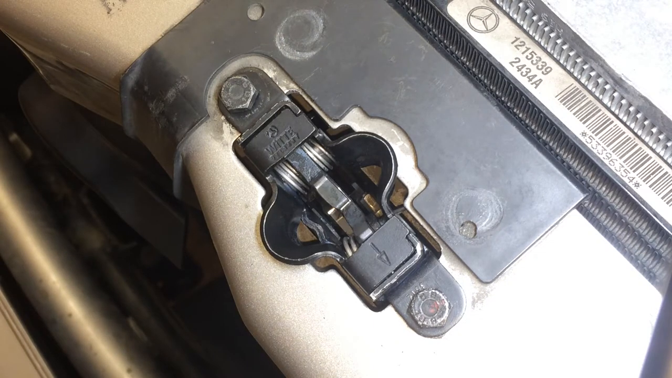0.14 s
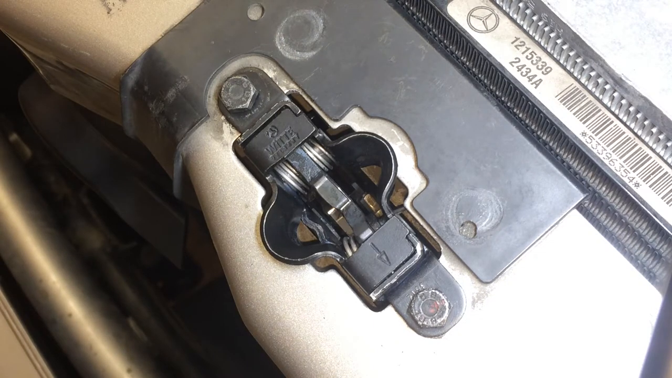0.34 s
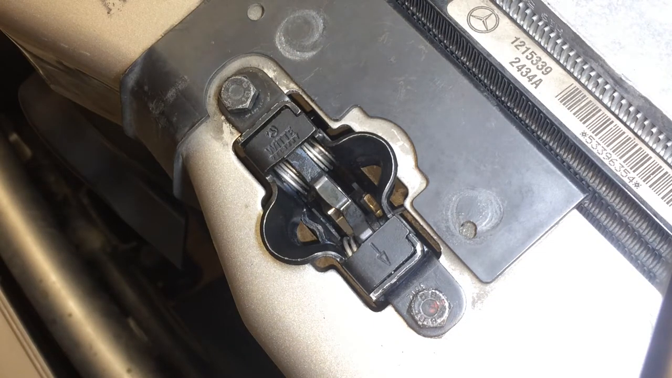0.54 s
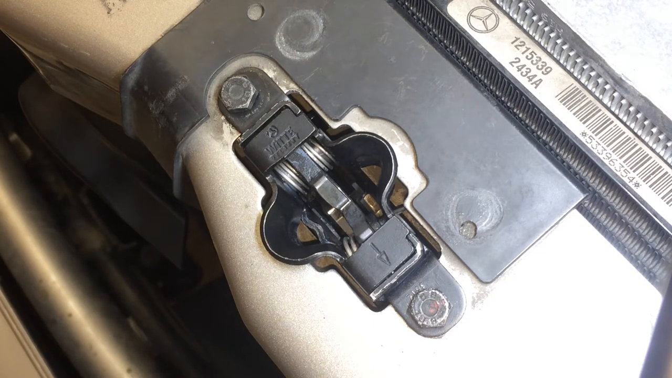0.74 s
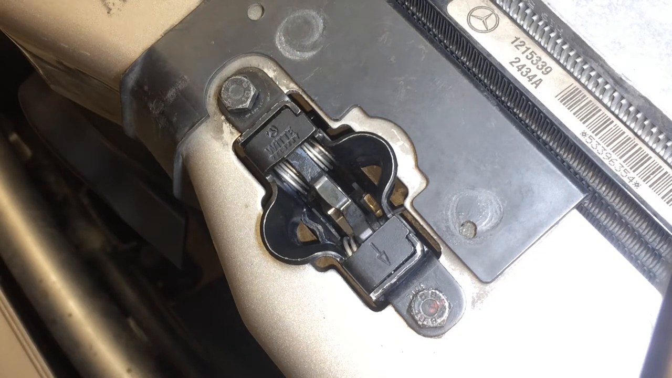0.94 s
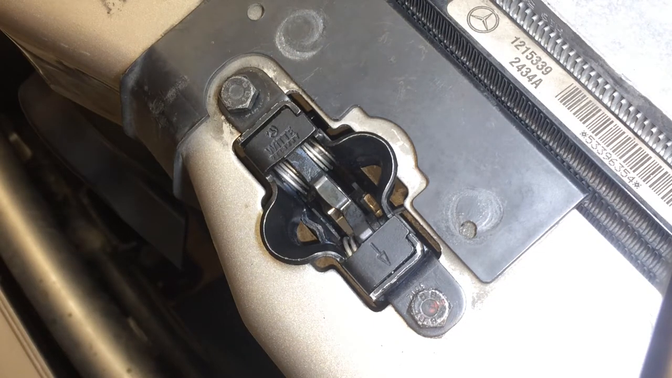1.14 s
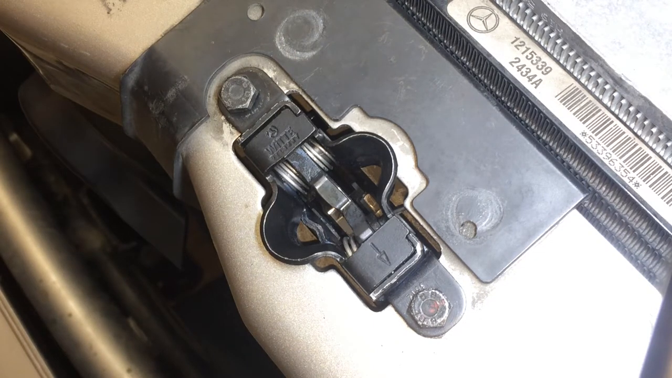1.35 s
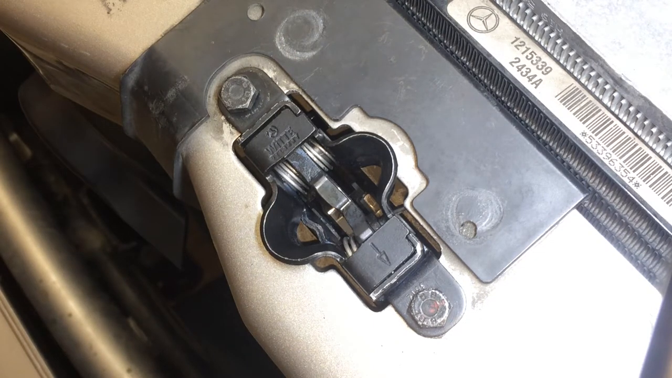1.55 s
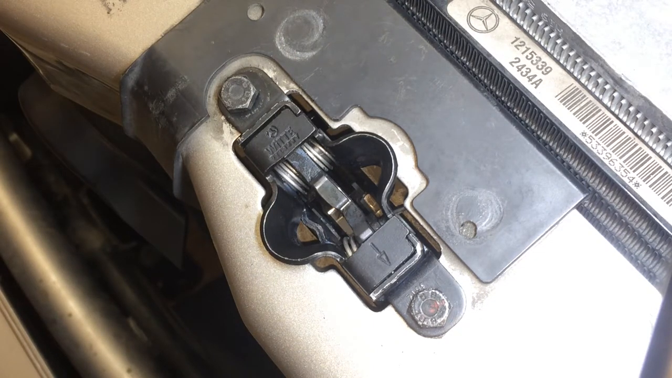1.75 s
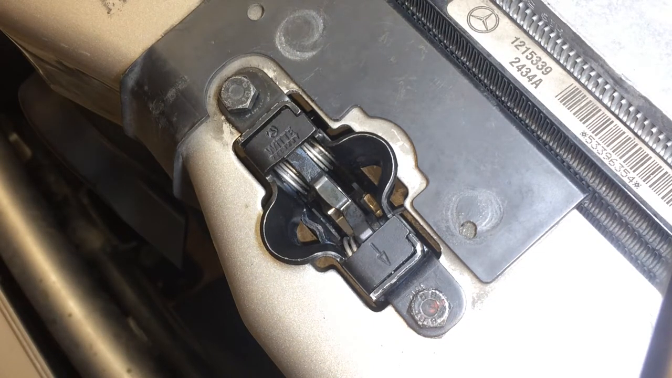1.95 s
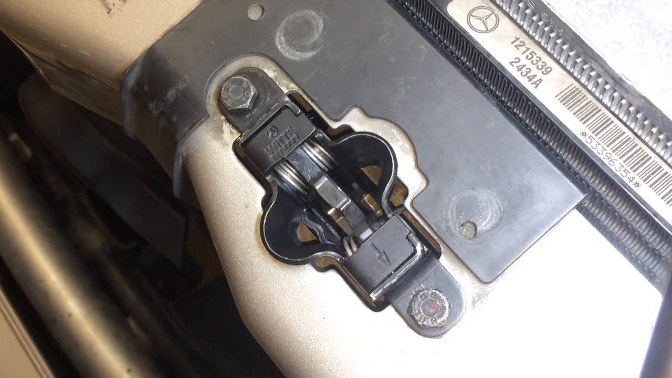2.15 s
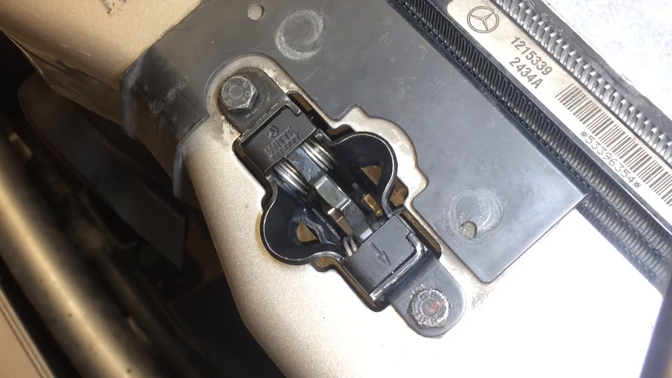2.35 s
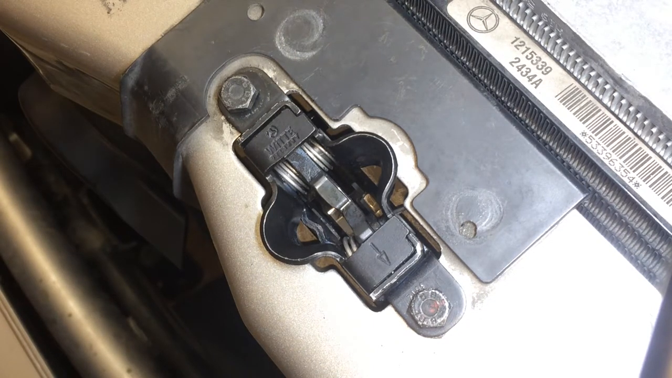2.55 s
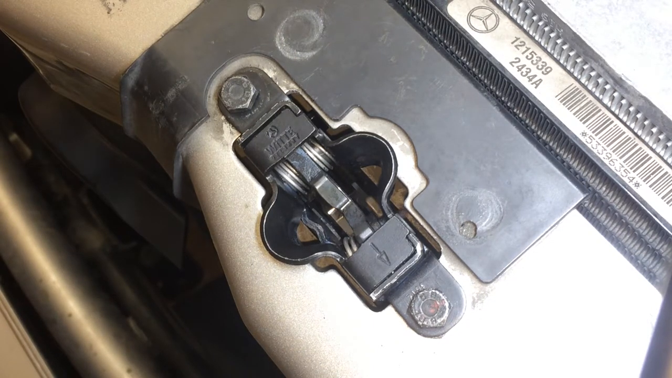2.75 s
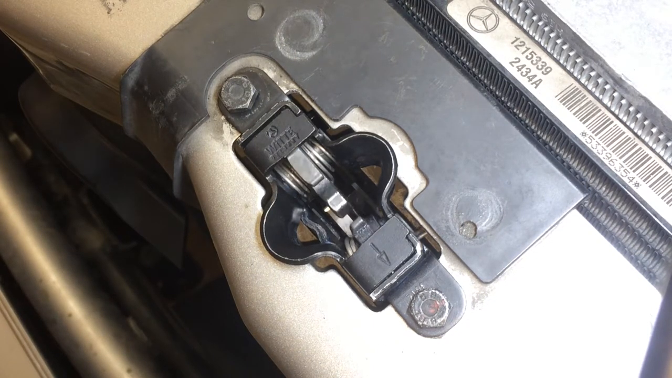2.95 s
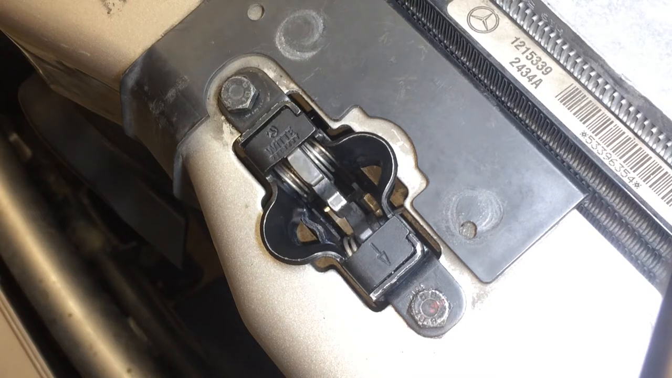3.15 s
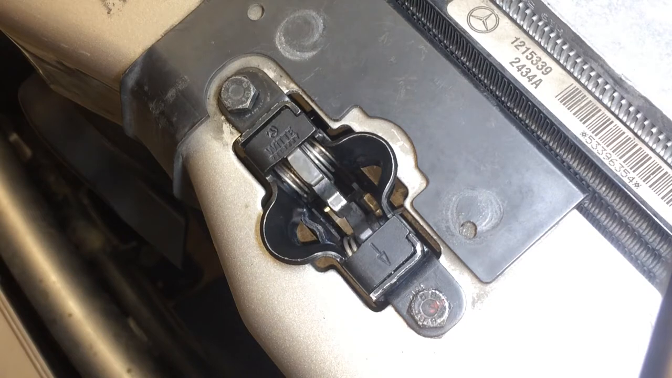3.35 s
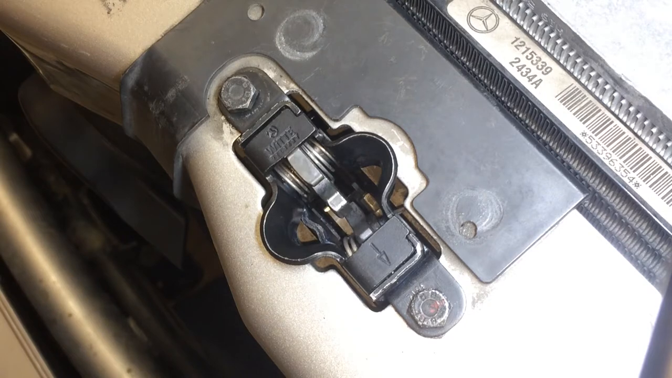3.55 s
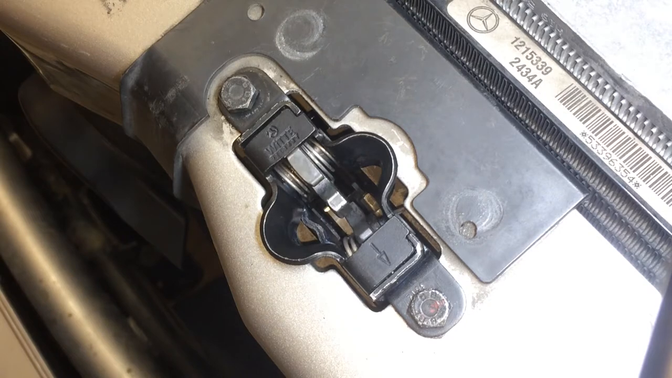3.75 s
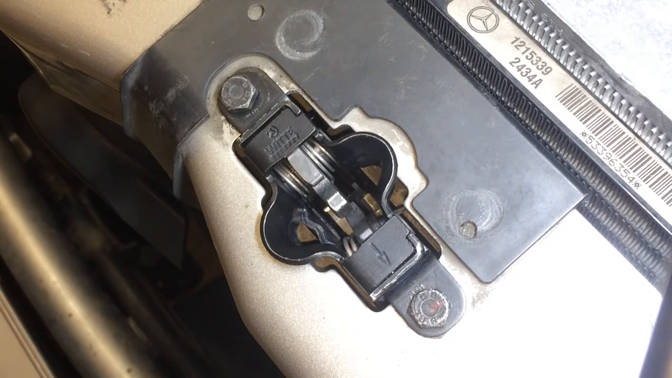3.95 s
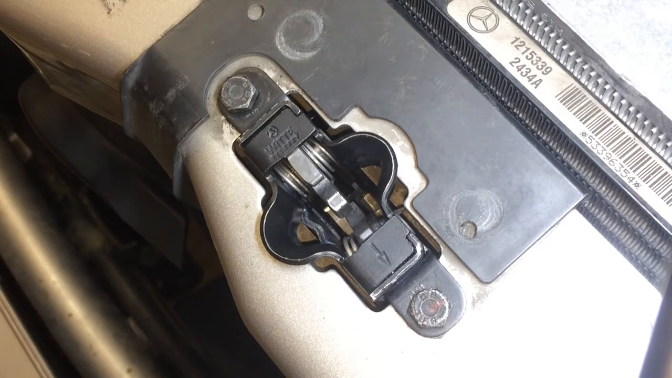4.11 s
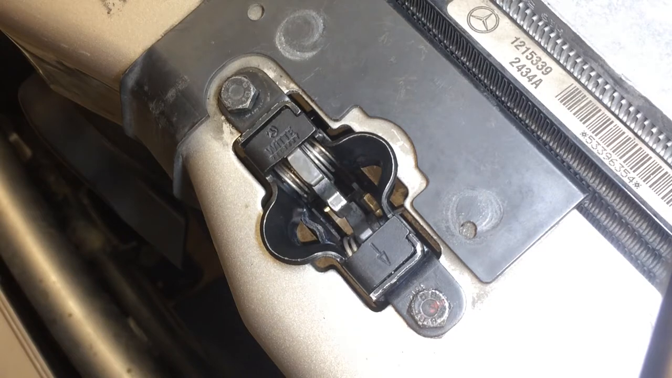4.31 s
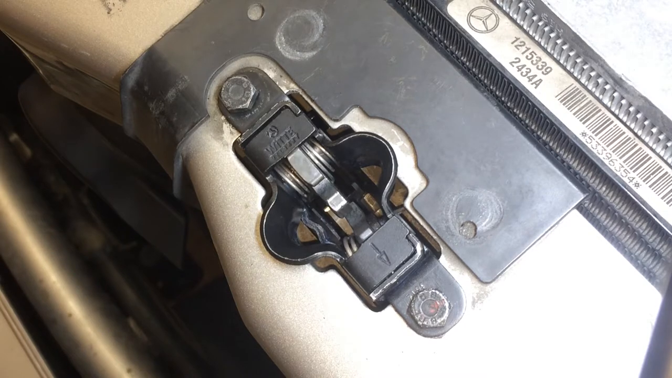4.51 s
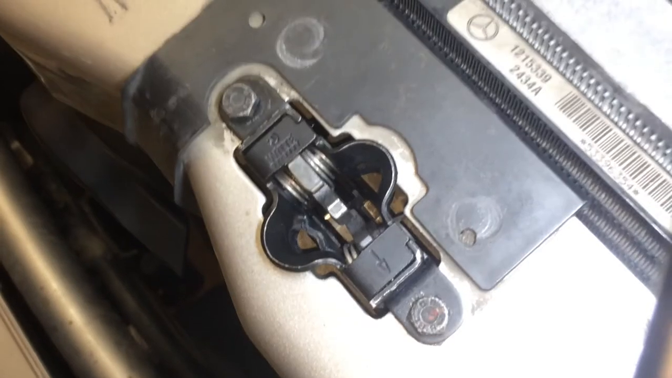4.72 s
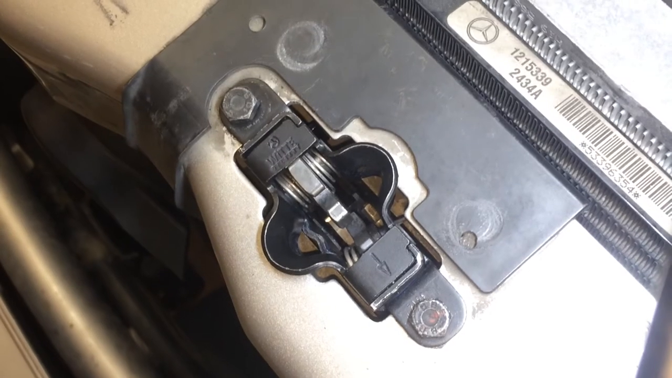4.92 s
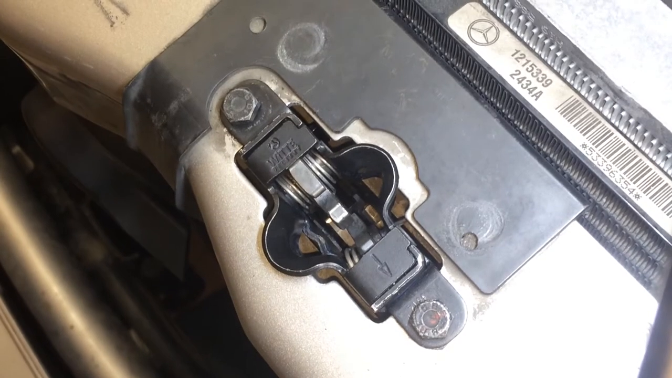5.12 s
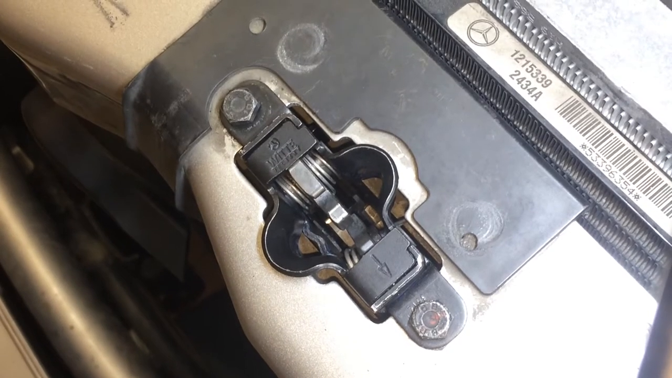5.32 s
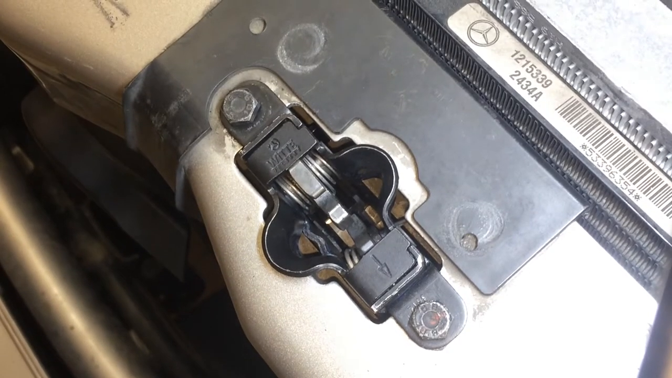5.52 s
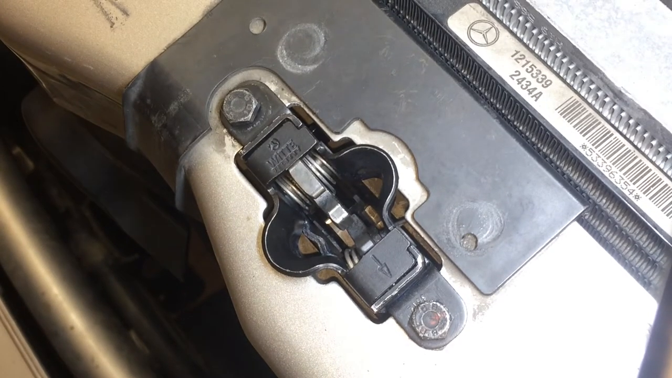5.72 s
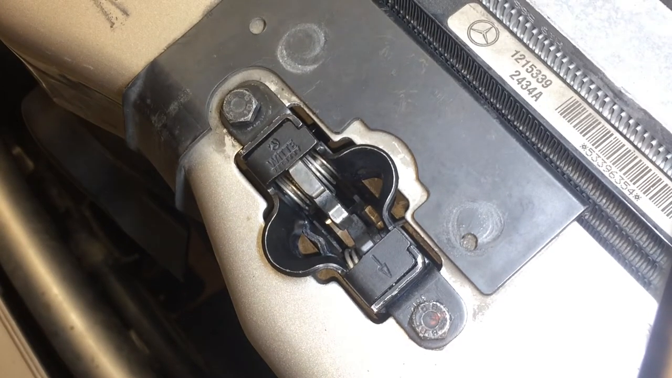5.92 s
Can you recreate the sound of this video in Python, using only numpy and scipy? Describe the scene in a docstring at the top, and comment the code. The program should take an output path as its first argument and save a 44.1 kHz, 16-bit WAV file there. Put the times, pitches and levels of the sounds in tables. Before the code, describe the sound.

A quiet garage with a very faint motor hum throughout. Soft footsteps and scuffs come in the first second. At about 0.9 seconds a car door unlatches with a clunk and a small clink, its hinge creaks briefly, and at 1.3 seconds it hits its stop with a hollow thump. Faint steps follow around 1.8 seconds, and a light knock at 2.4. At 2.9 seconds the steel hood latch snaps open close to the microphone: a sharp crack with a short metallic ring, the loudest sound. Its lever springs back with a smaller click at 3.1 seconds. After a couple of soft steps, the door slams at about 4.6 seconds, farther away than the latch, with a boomy thud and a brief shudder of sheet metal. A light hollow knock and a few quiet steps come between 5.5 and 5.8 seconds.

```python
"""A car's steel hood latch snaps open close by in a garage, and its lever springs back with a click.
Before that, someone steps up and opens the car door to pull the hood release; afterwards the door
is slammed and the steps move on. Each blow is a burst of noise, often with fading tones for the
ringing metal. A motor hums faintly. An automatic volume control turns everything down after the snap."""
import sys
import numpy as np
from scipy.fft import rfft, irfft, next_fast_len
from scipy.io import wavfile
from scipy.ndimage import uniform_filter1d, map_coordinates

SR = 44100
rng = np.random.default_rng(int(sys.argv[2]) if len(sys.argv) > 2 else 0)


def wav_out(sig):
    """Save sig, one row per channel (or a flat mono array), as 16-bit PCM at SR to the path in sys.argv[1]."""
    wavfile.write(sys.argv[1], SR, np.round(np.clip(np.atleast_2d(sig).T, -1, 1) * 32767).astype(np.int16))


N = 267775
TIME = np.arange(N) / SR
AGE = np.arange(SR) / SR  # seconds since a blow; each blow gets one second

# A spectrum says how strong a noise is at each pitch, low to high.
# "rise" is the time a sound takes to swell, "t60" the time it takes to fade by 60 dB.
MOTOR_TONES = [(59.2, -70.5), (118.4, -71), (414.5, -79), (721.4, -84), (877.5, -75), (1303, -90),
               (1707, -86.5), (2078, -92)]  # the motor's hum and whine: f/Hz, level/dB
# spectra of the low rumble and soft hiss of the garage: f/Hz, level/dB
RUMBLE = [(12, -66), (20, -39), (43, -6.5), (70, -3.5), (87, -18.5), (118, 1), (147, -14.5), (212, -7.5),
          (235, -15), (414, -15.5), (600, -27), (780, -58.5), (1320, -120)]
AIR = [(350, -44.5), (600, -14.5), (850, -13), (1050, -16.5), (1400, -17.5), (1750, -13.5), (2100, -20.5),
       (2600, -24.5), (4600, -27.5), (9000, -30.5), (15500, -34)]
# how long echoes last in the garage and right around the latch: f/Hz, t60/s
GARAGE_ECHO = [(50, 0.71), (130, 0.84), (450, 0.46), (1400, 0.56), (4000, 0.53), (7000, 0.42), (12000, 0.4)]
NEAR_ECHO = [(150, 0.27), (600, 0.26), (1500, 0.34), (3600, .38), (7000, 0.2782), (12000, 0.24)]

STEPS = [(0.208, -43.5, -60), (1.754, -52, -64.5), (1.921, -56, -52), (3.717, -50.5, -70),
         (4.402, -55, -87), (5.653, -56, -59), (5.797, -55.5, -63)]  # footsteps: t/s, weight/dB, grit/dB
SCUFFS = [(0.301, -63), (.39, -64.5), (.595, -64), (.81, -66.5), (1.706, -65.5), (2.075, -59),
          (5.509, -65.5)]  # brushing shoes and clothes: t/s, level/dB
# spectra of a deep thud, a gritty scrape and a bright tick: f/Hz, level/dB
THUD = [(25, -24.5), (70, -9), (130, 3), (190, -3.5), (330, -11.5), (600, -31), (1500, -64), (4000, -91)]
GRIT = [(300, -9), (1200, 3), (2600, 3), (5000, -3), (8000, -7.5), (15000, -20.5)]
TICK = [(1500, -30), (4000, -6), (7000, 2), (11000, -1), (15000, -4)]
KNOCK_SHAPE = [(.15, -26.5), (.45, 0.5), (.7, 3), (1.3, -1.5), (1.8, -6), (3, -14.5), (8, -44)]  # spectrum of a knock: multiple of its centre pitch, level/dB

BUMPS = [(.840, -48.5, -55), (.89, -44.5, -51.5), (1.25, -53, -53.5), (1.312, -31, -32.5),
         (1.434, -45.5, -49), (4.606, -37, -34)]  # the door nudges its catch and stop: t/s, thud/dB, knock/dB
REBOUNDS = [(1.391, -34, -67), (4.697, -29, -38)]  # its first bounce off the stop or seal: t/s, thud/dB, knock/dB
LOCK_TICKS = [(0.841, -59, 0.015), (1.438, -63.5, 0.22), (4.7198, -40, 0.019)]  # the lock is pulled, comes to rest and seats: t/s, level/dB, t60/s
CREAKS = [(1.02, 0.0036, -45), (1.034, 0.0013, -37), (1.054, 0.0035, -45), (1.079, .006, -50),
          (1.115, 0.0089, -54), (1.17, .01, -59)]  # hinge creaks: t/s, rise/s, level/dB
# ringing tones of the door's handle, lock and hinge, and of loose sheet metal: f/Hz, level/dB, t60/s
HANDLE_TONES = [(2340, -14, 0.38), (2580, -16, .35), (3700, -5, 0.16), (4220, 0, 0.13), (4750, -2, 0.15),
                (5200, -1, 0.11), (6370, -12, 0.22)]
LOCK_TONES = [(1010, -7, 0.61), (1108, -8, 1), (1240, -9, 0.24), (1580, -16, 0.46), (2220, -23, 0.46),
              (2480, -21, 0.16), (2840, -29, 0.41), (4080, 9, 0.21), (5270, -14, 0.17), (5330, 3, 0.21),
              (6000, -6, 0.31), (6368, 0.5, 0.36), (6600, -3, 0.24), (7400, -36, 0.31)]
HINGE_TONES = [(1160, -0.5, 0.099), (1270, 2, 0.19), (1310, -1, 0.17), (1426, -5, 0.27), (1560, -9, 0.24),
               (1615, -5, 0.13)]
SHEET_TONES = [(118.8, 4.5, 1.6), (186, 3.5, 1), (770, -11, 1.05), (990, -2.5, 0.77), (1000, -8, 0.71),
               (1100, -15, 0.89)]
# the door unlocks, hits its stop, slams: t/s, rise/s, clatter/dB, panel/dB, lock/dB, clatter t60 factor
DOOR_BLOWS = [(0.947, 0.016, -28.5, -25, -54, 0.75), (1.310, 0.011, -26, -24, -51.5, 0.78),
              (4.620, 0.012, -17, -16.5, -38, 0.72)]
# car body tones; each blow lands elsewhere and has its own mix: f/Hz, t60/s, unlock/dB, swing/dB, slam/dB
PANEL_TONES = [(40.4, 0.41, -24, -27, -11), (54.1, 1, -19, -15, -9), (74.8, 0.38, -4, -14, -8),
               (114.56, 0.73, -19, 0, -10.5), (132.1, 0.4, 4, -17, 1), (188.3, 0.56, -11, -21, -17),
               (205.7, 0.42, -16, 2.5, -10.5), (263.6, 0.26, -26, -3, -11), (301.5, 0.39, -4.5, -5, -10),
               (330.6, 0.27, -7, 2, -9.5), (385.6, 0.47, -14, -10, -18), (396, 0.27, -7, -6.5, -8.5),
               (439, 0.29, -20, -10, -10), (490, 0.3, -10.5, -6, -16), (542, 0.45, -15.5, -10, -16.5),
               (652, 0.35, -20, -26, -16), (740, 0.46, -39, -10, -22), (807, 0.19, -35, -3.5, -37),
               (926, 0.27, -32, -22, -14.5), (989, 0.38, -31, -10.5, -22), (1162, 0.2, -32, -10.5, -12),
               (1272, 0.22, -32, -13, -19)]
# spectra of the three blows' clatter and of the body's shudder afterwards: f/Hz, level/dB
UNLOCK = [(18, -50), (30, -8.5), (144, -8.5), (249, -7.5), (399, -13), (591, -19), (852, -18.5), (996, -25),
          (2130, -28), (2760, -35.5), (3980, -35), (5040, -32), (6050, -39.5), (13600, -51.5),
          (15500, -63.5)]
SWING = [(18, -58), (30, -25), (102, 4), (208, -2), (263, -15.5), (341, -13), (410, -17), (728, -18),
         (874, -26), (970, -16), (1110, -22), (1290, -25), (1870, -23.5), (3980, -31), (15500, -64)]
SLAM = [(15, -40), (25, -2), (69, -8), (119, -3), (183, -13.5), (289, -9), (368, -21), (537, -13.5),
        (582, -16.5), (919, -17), (1050, -22.5), (1570, -20.5), (2170, -24), (6380, -30), (15500, -47.5)]
SHUDDER = [(15, -31), (25, -11), (53, 2), (151, -13.5), (184, -1), (262, -31.5), (299, -16), (342, -30),
           (399, -23), (436, -32), (948, -19), (1180, -30.5), (1890, -24.5), (2200, -35), (5000, -49.5),
           (6500, -79), (11000, -120)]
# knocks away from the latch: t/s, rise/s, level/dB, centre f/Hz, ring f/Hz, ring level/dB
HOLLOW_KNOCKS = [(2.398, 0.015, -47.5, 910, 1450, -52.5), (5.603, 0.0041, -44, 900, 289.5, -47.5)]

LATCH_HITS = [(2.841, -58, -72, -62.5, -69.5), (2.8629, -46, -45, -47, -48), (2.886, 0, -23, -10.5, -18.5),
              (2.8928, -12.5, -28.5, -26, -47.5), (2.9007, -13.5, -12, -24.5, -49.5)]  # latch parts strike each other: t/s, crack/dB, steel/dB, echo/dB, jolt/dB
LEVER_HITS = [(3.1208, -16.5, -39, -29)]  # the lever hits its stop: t/s, crack/dB, steel/dB, echo/dB
STEEL_TONES = [(390, -13.5, .25), (550.7, -11.5, 0.24), (649, -4, 0.26), (1190, -5, .25), (1372, -4, .28),
               (1574.5, 1, 0.19), (1750, -1, 0.11), (1819, -1, 0.16), (1915, -3.5, .17), (2247, -5, .2),
               (2416, -3.5, 0.28), (2424, 4, 0.24), (2645, -1, .14), (2870, -8, 0.29), (3110, -8.5, 0.14),
               (3280, -2, .24), (3370, -8.5, 0.25), (3725, -3, 0.32), (3764, -6.5, .25), (3680, -9, 0.28),
               (4100, -5, .22), (4914, -10.5, 0.2), (5196, -10.5, .27), (5640, -11, 0.16),
               (6430, -11.5, 0.32), (7000, -12.5, .22), (10300, -15, .18), (11200, -15.5, .17),
               (11600, -16, 0.16)]  # ringing tones of the latch: f/Hz, level/dB, t60/s
# spectra of the latch's snap, the lever's click and their echoes: f/Hz, level/dB
SNAP = [(210, -44.5), (350, -9), (1230, -24.5), (1820, -3.5), (2130, -6), (2390, 1), (2980, -20.5),
        (3330, -4.5), (3960, -12), (6480, -13.5), (8620, -18.5), (12600, -20), (15500, -24)]
SNAP_ROOM = [(88, -46.5), (150, -10), (326, -34.5), (388, -18.5), (631, -4.5), (912, -11), (1540, -8.5),
             (1660, -7.5), (2360, -5.5), (2700, -12), (3620, -4), (4390, -12), (6110, -9.5), (11600, -22.5),
             (15500, -29)]
CLICK = [(530, -50), (900, -17), (1350, -9), (2390, 1), (2820, -8), (4330, -10.5), (5570, -20),
         (6420, -15.5), (9630, -23), (10100, -23), (15500, -23)]
CLICK_ROOM = [(71, -48), (120, -33), (138, -25), (173, -22), (325, -7.5), (415, -3), (623, -5), (704, -5),
              (1150, -3.5), (1430, -11), (1870, -10), (9910, -29), (15500, -39)]


def amp(db):
    """Turn decibels into a number to multiply by."""
    return 10 ** (np.asarray(db) / 20)


def filtered(x, response):
    """Make each pitch in x stronger or weaker, as response(hz) says."""
    size = next_fast_len(len(x) + 8192)
    return irfft(rfft(x, size) * response(np.fft.rfftfreq(size, 1 / SR)), size)[:len(x)]


def noise(spectrum, size=SR):
    """Noise shaped to a spectrum, with an average strength (rms) of 1."""
    freqs, levels = np.transpose(spectrum)
    white = rng.standard_normal(size)
    shaped = filtered(white, lambda hz: amp(np.interp(np.log(hz + 1), np.log(freqs + 1), levels)))
    return shaped / np.sqrt(np.mean(shaped ** 2) + 1e-20)


def wobble(rate, size=SR):
    """A smooth curve through random points, rate of them a second."""
    points = rng.standard_normal(1024)
    return map_coordinates(points, [np.arange(size) * rate / SR], order=2, mode="wrap")


def fade(t60, rise):
    """Swell over the rise time, then die away."""
    return np.minimum(AGE / rise, 1) * amp(-60 * np.maximum(AGE - rise, 0) / t60)


def burst(spectrum, t60, rise):
    """A puff of noise that swells and dies away."""
    return noise(spectrum) * fade(t60, rise)


def knock(centre_hz, t60, rise):
    """A dull knock: a burst of noise spread widely around one pitch."""
    return burst([(multiple * centre_hz, db) for multiple, db in KNOCK_SHAPE], t60, rise)


def ring(tones, rise, blur):
    """Struck metal rings with several tones; loose joints make each waver by about blur radians."""
    sound = 0
    for hz, db, t60 in tones:
        waver = blur * wobble(rate=40)
        sound = sound + amp(db) * np.sin(2 * np.pi * hz * AGE + waver) * fade(t60, rise)
    return sound / np.sqrt(sum(amp(db) ** 2 for _, db, _ in tones) / 2)


def echo(spectrum, decays, rise, t60_factor=1):
    """A blow scattered by many walls and panels: each range of pitches fades at its own speed."""
    hz = np.fft.rfftfreq(SR, 1 / SR)
    source = rfft(noise(spectrum))
    centres, t60s = np.transpose(decays)
    sound = 0
    for one_band, t60 in zip(np.eye(len(decays)), t60s):
        share = np.interp(np.log(hz + 1), np.log(centres), one_band)
        sound = sound + irfft(source * share, SR) * fade(t60 * t60_factor, rise)
    return sound


def add(track, t, sound):
    """Mix a sound into the track, starting at t seconds."""
    part = track[round(t * SR):][:len(sound)]
    part += sound[:len(part)]


def motor_and_air():
    """A motor hums and whines in still air; its tones drift together as its speed wanders."""
    speed = 1 + 0.0025 * wobble(rate=13, size=N)
    motor_time = np.cumsum(speed) / SR
    hum = sum(amp(db) * np.sqrt(2) * np.sin(2 * np.pi * hz * motor_time) for hz, db in MOTOR_TONES)
    return amp(0.5) * hum + amp(-62.5) * noise(RUMBLE, size=N) + amp(-70.5) * noise(AIR, size=N)


def footsteps():
    """Each step is a thud, a heel knock and grit under the sole; shoes and clothes brush in between."""
    out = np.zeros(N)
    t60, rise = 0.36, 0.0066
    for t, weight_db, grit_db in STEPS:
        thud = burst(THUD, t60, rise)
        heel = amp(-5) * knock(centre_hz=290, t60=t60, rise=rise)
        add(out, t, amp(weight_db) * (thud + heel) + amp(grit_db) * burst(GRIT, t60, rise))
    for t, db in SCUFFS:
        add(out, t, amp(db) * burst(GRIT, t60=0.62, rise=0.018))
    return out


def bump(thud_db, knock_db):
    """One soft bump of the door: its weight thuds, its frame knocks and loose trim rattles."""
    t60, rise = 0.33, 0.0076
    frame = knock(centre_hz=850, t60=t60, rise=rise)
    trim = amp(-14.5) * burst(GRIT, t60, rise)
    return amp(thud_db) * burst(THUD, t60=0.34, rise=rise) + amp(knock_db) * (frame + trim)


def door_bumps():
    """The door shifts in its catch, pops off its seal and bounces."""
    out = np.zeros(N)
    for t, thud_db, knock_db in BUMPS:
        add(out, t, bump(thud_db, knock_db))
    for t, thud_db, knock_db in REBOUNDS:
        add(out, t, bump(thud_db, knock_db))
        add(out, t + 0.093, amp(-9) * bump(thud_db, knock_db))  # a second, weaker bounce
    add(out, 0.93, amp(-34.5) * burst(THUD, t60=0.3, rise=0.0092))  # the seal lets go
    return out


def door_fittings():
    """The handle's rods rub and clink, the hinge creaks as the door starts to move, and the lock ticks."""
    out = np.zeros(N)
    add(out, 0.845, amp(-60) * burst(GRIT, t60=0.53, rise=0.036))
    add(out, 0.953, amp(-45) * ring(HANDLE_TONES, rise=0.0017, blur=0.35))
    for t, rise, db in CREAKS:
        add(out, t, amp(db) * ring(HINGE_TONES, rise, blur=1.95))
    for t, db, t60 in LOCK_TICKS:
        add(out, t, amp(db) * burst(TICK, t60, rise=0.0008))
    return out


def door_blows():
    """Each blow clatters through the door and rings its panels and lock; the slam shakes the car body."""
    out = np.zeros(N)
    panel_hz, panel_t60, *mixes = np.transpose(PANEL_TONES)
    panels = [list(zip(panel_hz, levels, panel_t60)) for levels in mixes]
    for blow, spectrum, panel in zip(DOOR_BLOWS, (UNLOCK, SWING, SLAM), panels):
        t, rise, clatter_db, panel_db, lock_db, t60_factor = blow
        chatter = amp(0.68 * wobble(rate=240))  # loose parts strike one after another
        clatter = echo(spectrum, GARAGE_ECHO, rise, t60_factor)
        clatter = filtered(clatter, lambda hz: 1j * hz / (1j * hz + 170))  # small parts give little bass
        add(out, t, amp(clatter_db) * chatter * clatter)
        add(out, t, amp(panel_db) * ring(panel, rise, blur=0.92))
        add(out, t, amp(lock_db) * ring(LOCK_TONES, rise, blur=0.38))
    # the slammed door bounces on its seal, so the panels boom once more and shudder
    add(out, 4.686, amp(-28.5) * ring(panels[-1], rise=0.0068, blur=0.5))
    add(out, 4.76, amp(-46.5) * burst(SHUDDER, t60=0.94, rise=0.22))
    add(out, 4.76, amp(-51.5) * ring(SHEET_TONES, rise=0.18, blur=0.44))
    return out


def hollow_knocks():
    """Light, hard knocks on hollow things, each with a faint thud and one ringing tone."""
    out = np.zeros(N)
    t60, ring_t60 = 0.3, 0.25
    for t, rise, db, centre_hz, ring_hz, ring_db in HOLLOW_KNOCKS:
        add(out, t, amp(db) * (knock(centre_hz, t60, rise) + amp(-13) * burst(THUD, t60, rise)))
        add(out, t, amp(ring_db) * ring([(ring_hz, 0, ring_t60)], rise, blur=1.7))
    return out


def hood_latch():
    """The cable tugs the catch until it snaps open: each hit cracks, rings, echoes and thuds."""
    out = np.zeros(N)
    for t, crack_db, steel_db, echo_db, jolt_db in LATCH_HITS:
        add(out, t, amp(crack_db) * burst(SNAP, t60=0.041, rise=0.0019))
        add(out, t, amp(steel_db) * ring(STEEL_TONES, rise=0.001, blur=0.5))
        add(out, t, amp(echo_db) * echo(SNAP_ROOM, NEAR_ECHO, rise=0.0037))
        add(out, t, amp(jolt_db) * burst(THUD, t60=0.06, rise=0.0024))
    # the tug shoves the beam that holds the latch: one pulse, no ringing
    from_peak = (TIME - 2.879) / 0.0016
    shove = (1 - from_peak ** 2 / 2) * np.exp(-np.abs(from_peak))
    return out - amp(-18) * shove


def catch_squeak():
    """The catch squeaks with two wavering tones as it slides off its seat."""
    out = np.zeros(N)
    add(out, 2.869, amp(-38) * ring([(2680, 2.0, 0.12), (3000, -3.5, 0.05)], rise=0.011, blur=1.7))
    return out


def lever():
    """The lever springs back onto its stop with a click; the cable passes the jolt to the car body."""
    out = np.zeros(N)
    for t, crack_db, steel_db, echo_db in LEVER_HITS:
        add(out, t, amp(crack_db) * burst(CLICK, t60=0.059, rise=0.00036))
        add(out, t, amp(steel_db) * ring(STEEL_TONES, rise=0.00095, blur=0.36))
        add(out, t, amp(echo_db) * echo(CLICK_ROOM, GARAGE_ECHO, rise=0.0094, t60_factor=0.86))
        add(out, t + 0.0076, amp(-20) * knock(centre_hz=870, t60=0.047, rise=0.0021))
    return out


def soft_footfall():
    """A soft, dull footfall just before the slam."""
    out = np.zeros(N)
    add(out, 4.51, amp(-55) * knock(centre_hz=297, t60=0.44, rise=0.025))
    return out


def scene():
    """Latch, door and feet over the quiet garage, in one channel."""
    hood = hood_latch() + lever() + catch_squeak()
    at_the_door = door_blows() + door_bumps() + soft_footfall() + door_fittings()
    return (hood + at_the_door + footsteps() + hollow_knocks() + motor_and_air())[None]


def volume_control(x, threshold_db, recovery_db_per_s):
    """Loud sounds pull the volume down at once; then it creeps back up."""
    power = np.abs(uniform_filter1d(x ** 2, size=220))
    excess_db = np.maximum(10 * np.log10(power + 1e-12) - threshold_db, 0)
    recovery_db = recovery_db_per_s * TIME
    cut_db = np.maximum.accumulate(excess_db + recovery_db) - recovery_db
    return x * amp(-uniform_filter1d(cut_db, size=64))


def record(dry):
    """Turn loud moments down, round off the tallest peaks and cut the highest treble."""
    ceiling, top_hz = 0.75, 15500
    held = volume_control(dry[0], threshold_db=-12, recovery_db_per_s=12.5)
    rounded = held / (1 + (held / ceiling) ** 6) ** (1 / 6)
    return filtered(rounded, lambda hz: 1 / (1 + (hz / top_hz) ** 160))[None]


dry = scene()
out = record(dry)
wav_out(out)
```